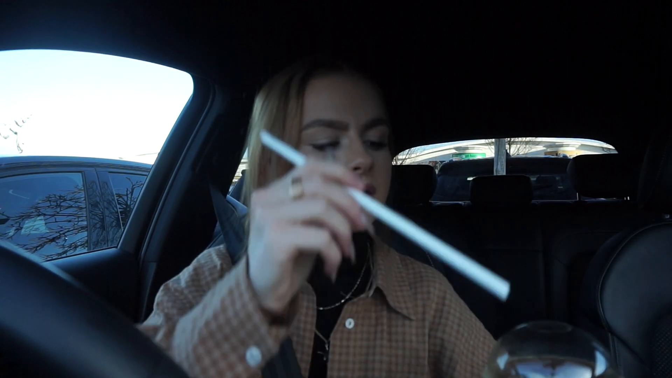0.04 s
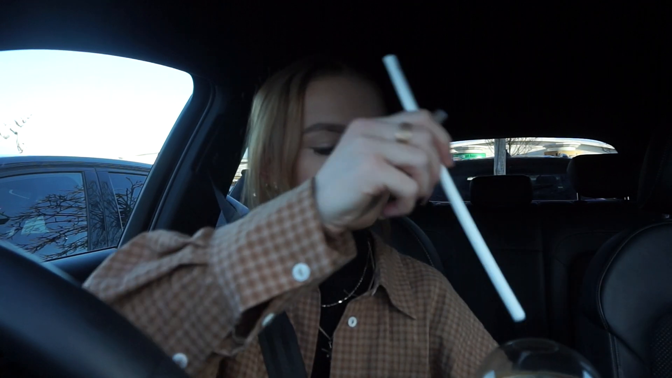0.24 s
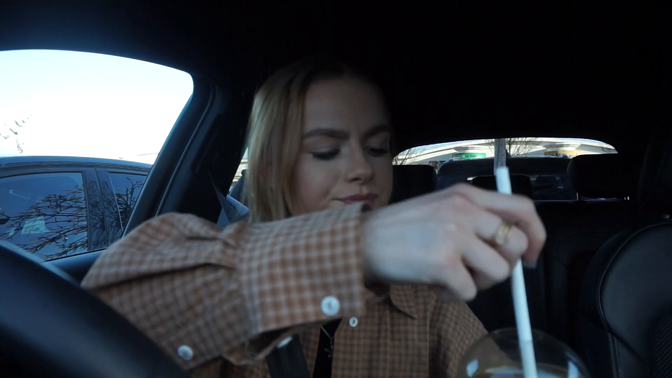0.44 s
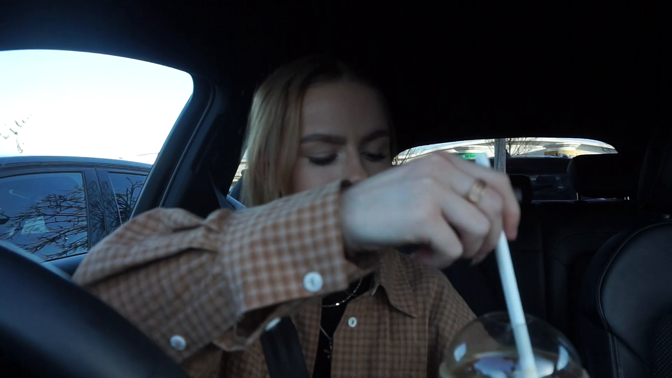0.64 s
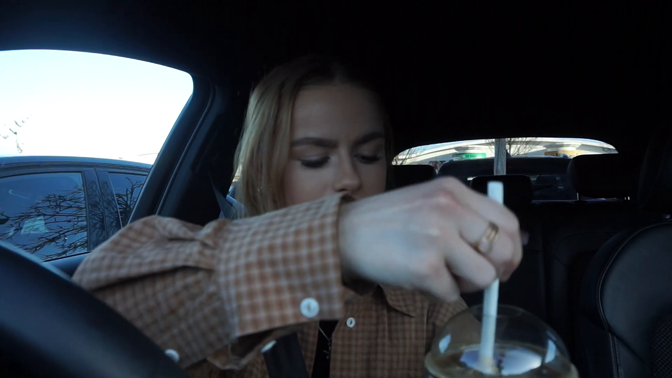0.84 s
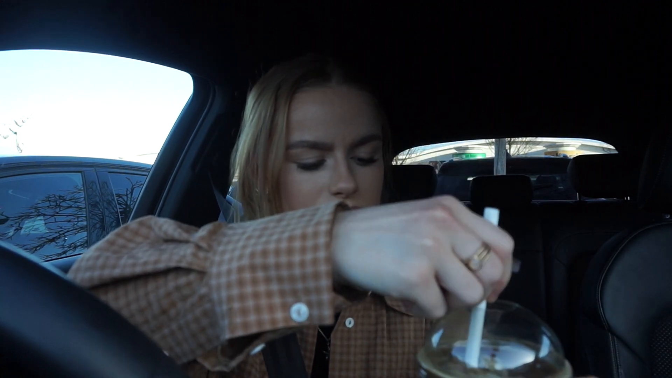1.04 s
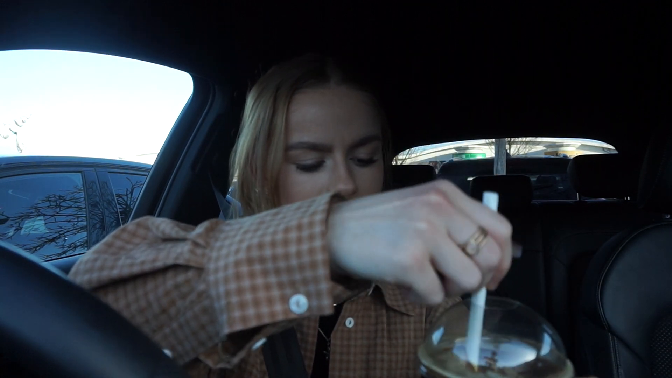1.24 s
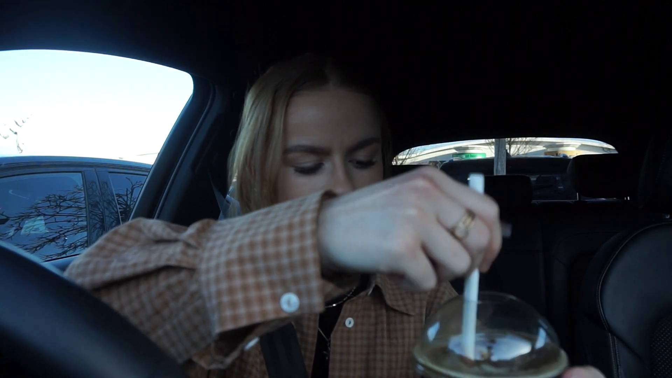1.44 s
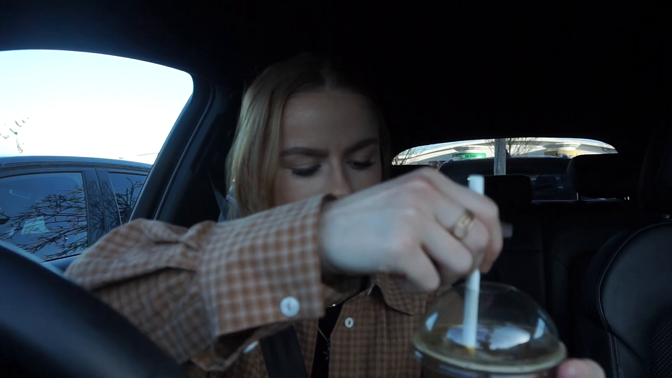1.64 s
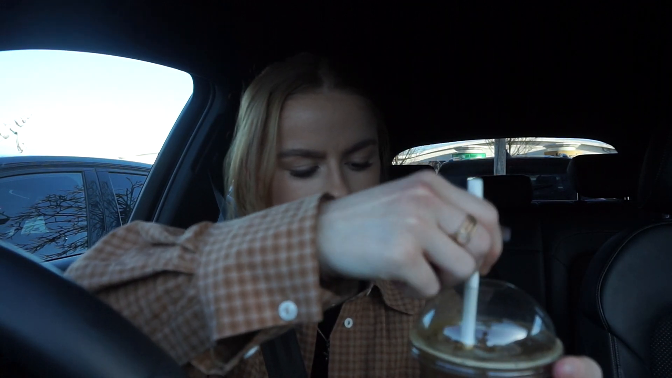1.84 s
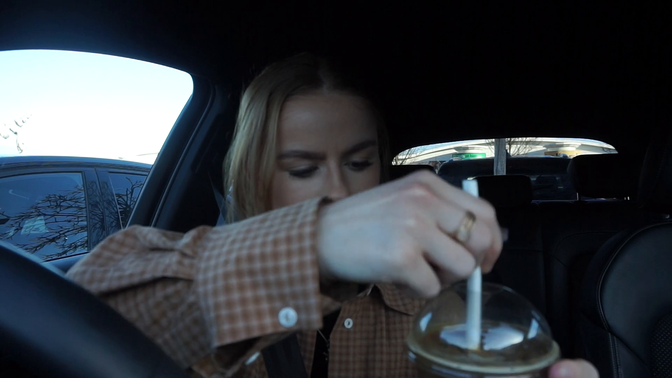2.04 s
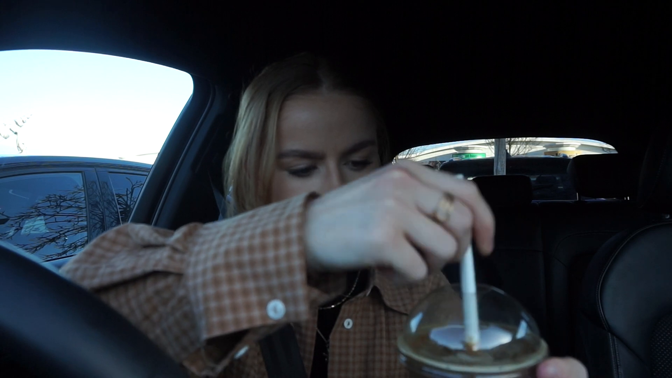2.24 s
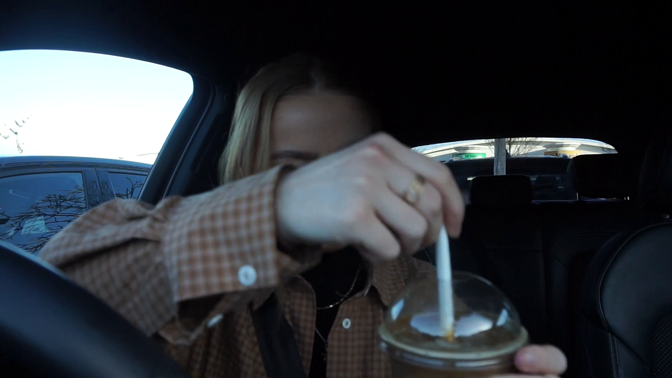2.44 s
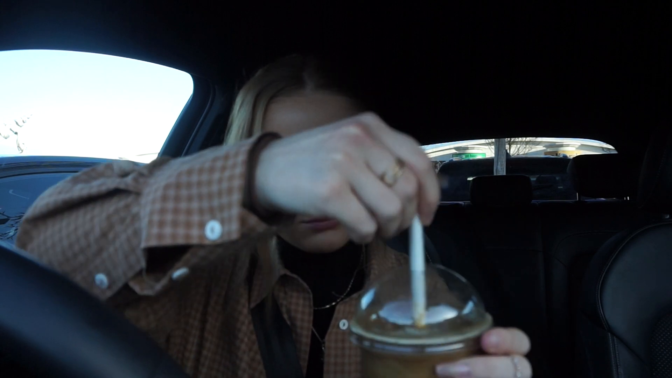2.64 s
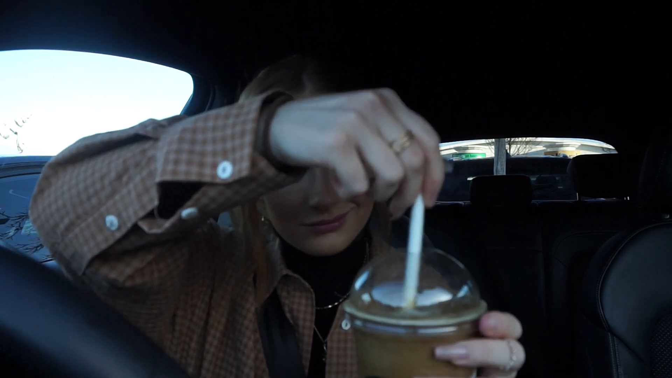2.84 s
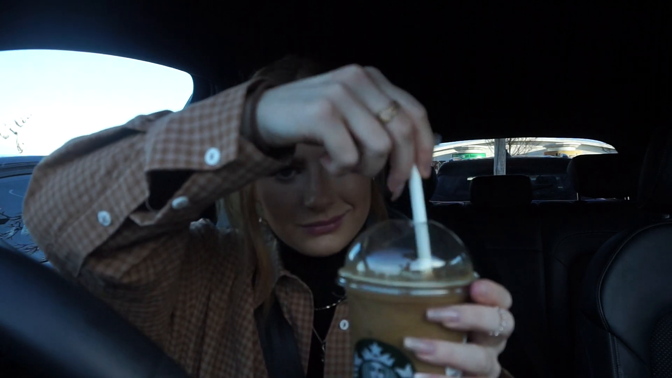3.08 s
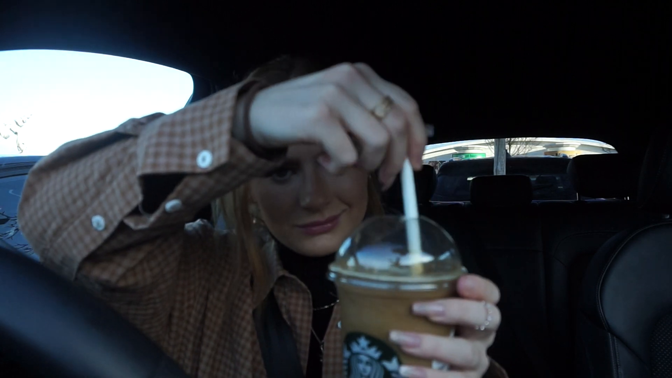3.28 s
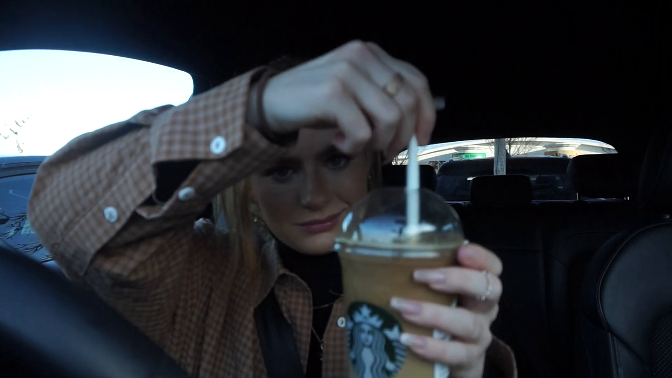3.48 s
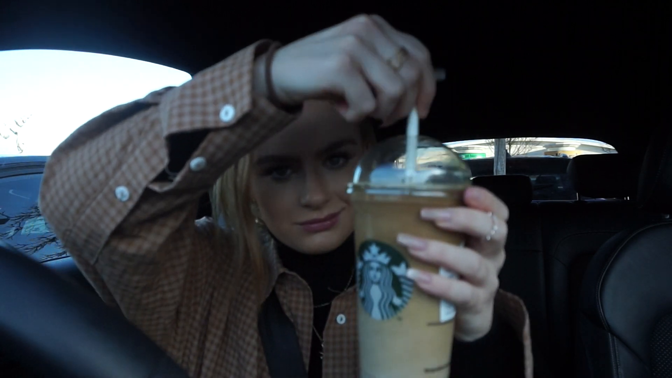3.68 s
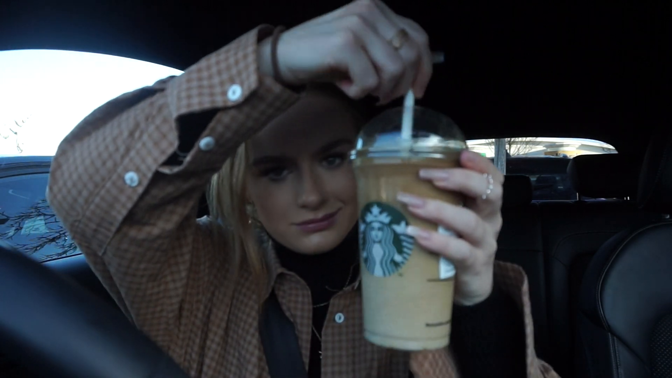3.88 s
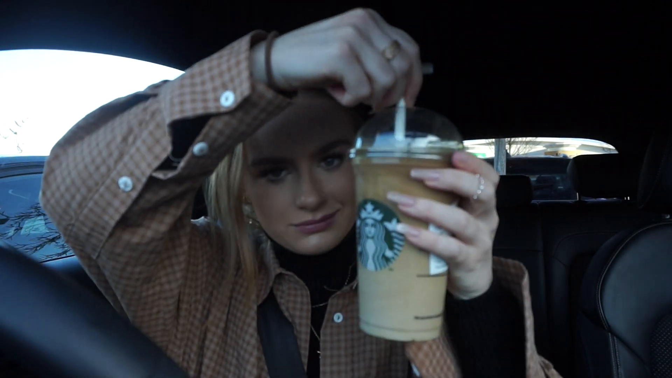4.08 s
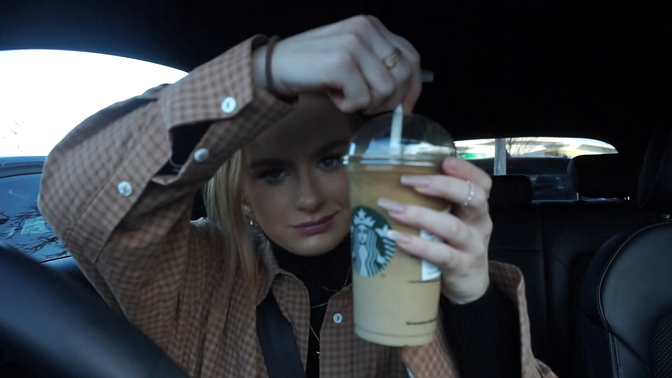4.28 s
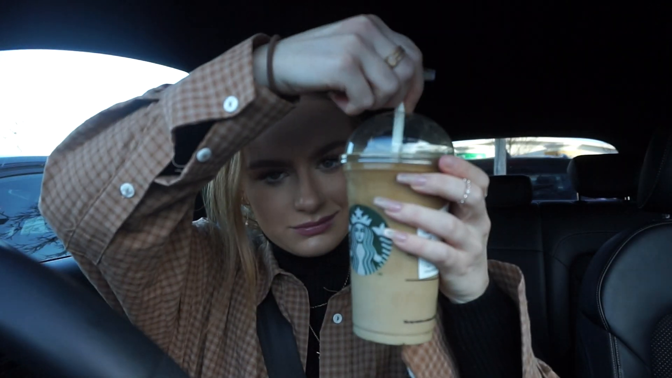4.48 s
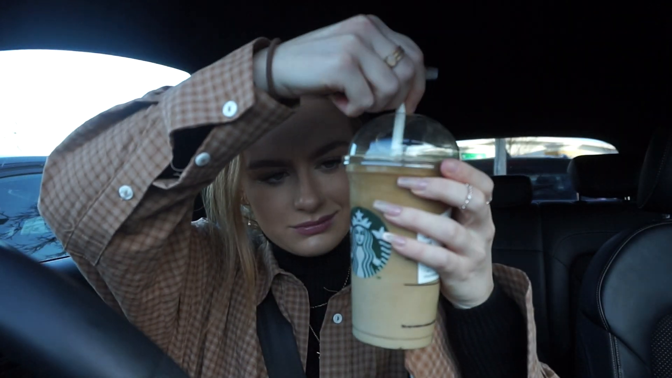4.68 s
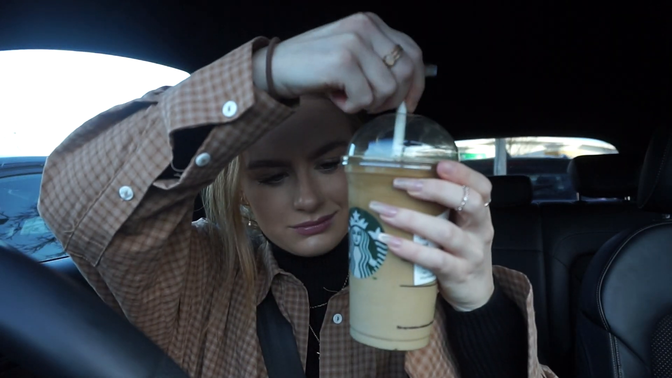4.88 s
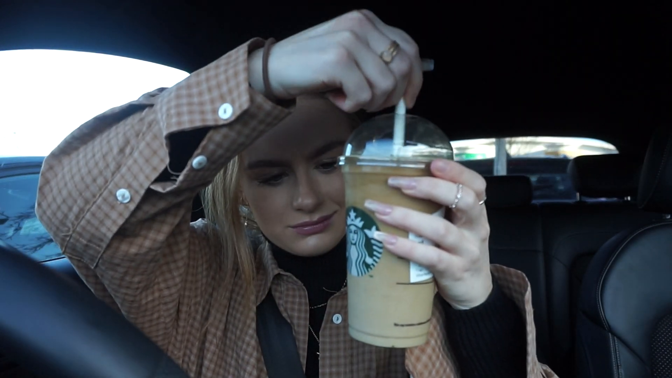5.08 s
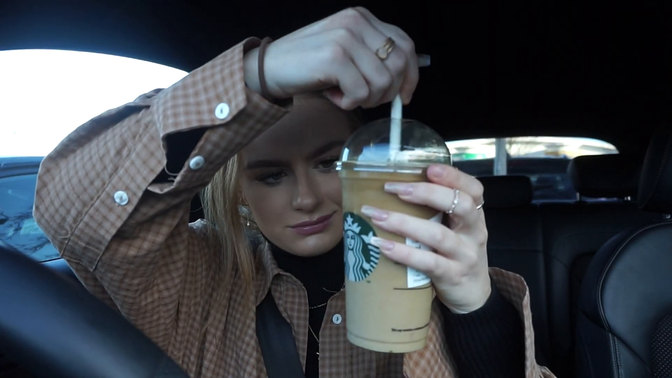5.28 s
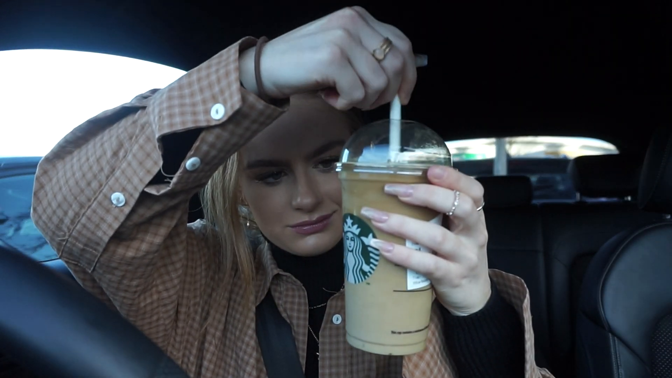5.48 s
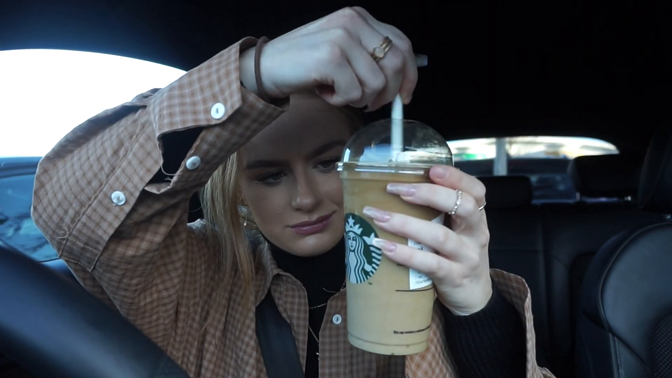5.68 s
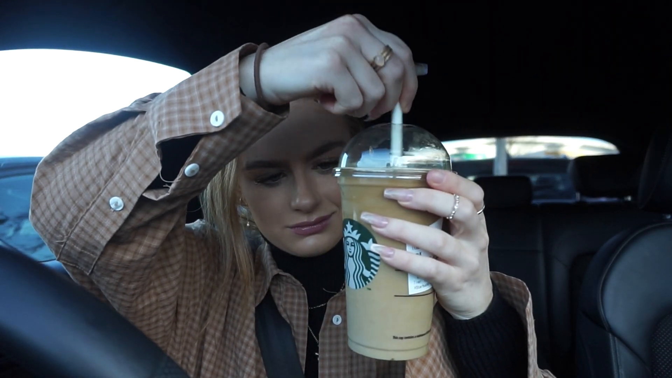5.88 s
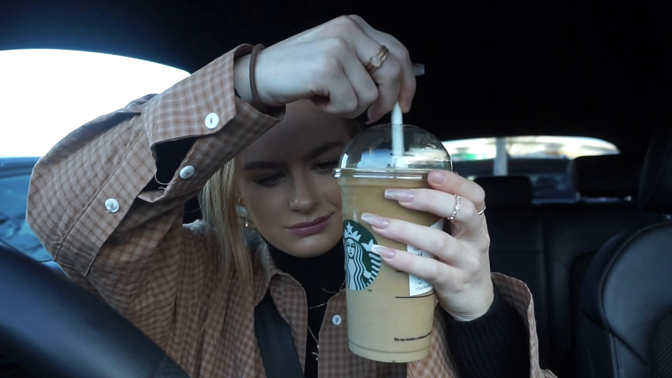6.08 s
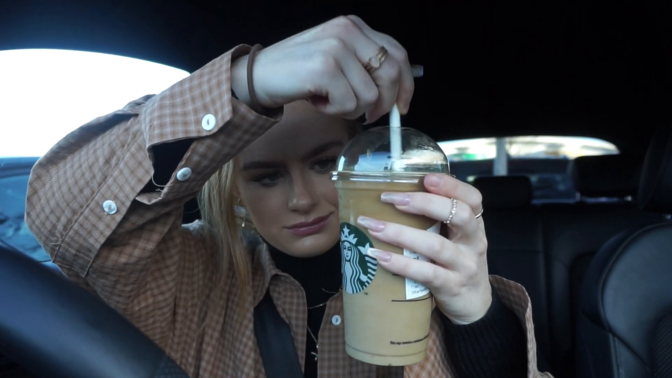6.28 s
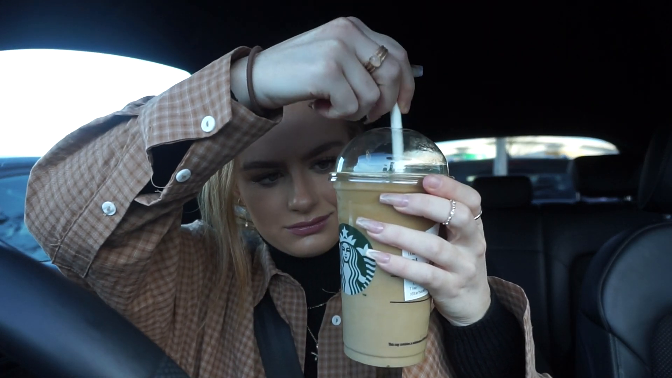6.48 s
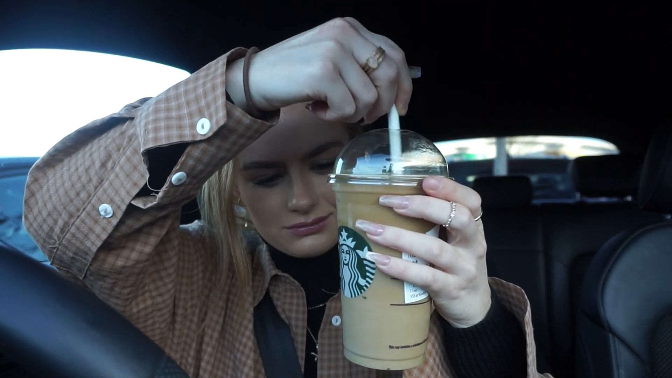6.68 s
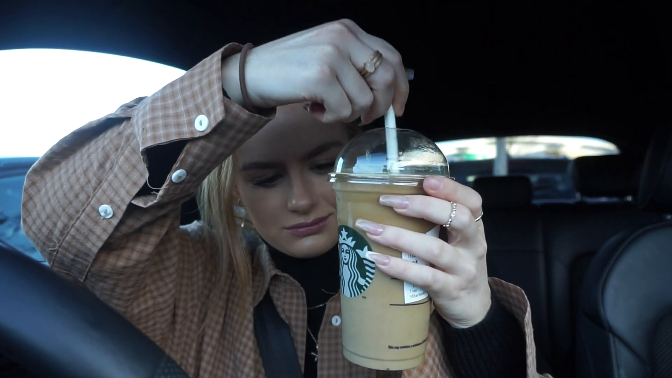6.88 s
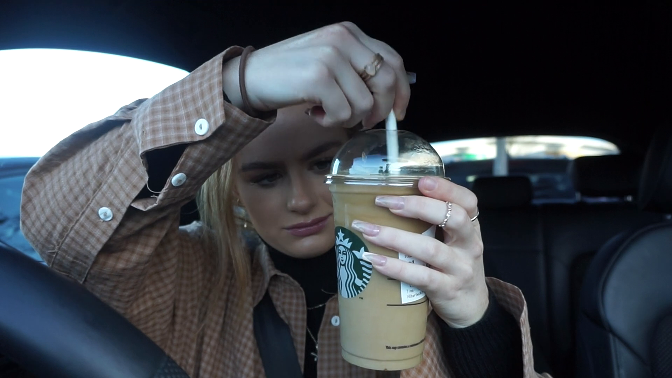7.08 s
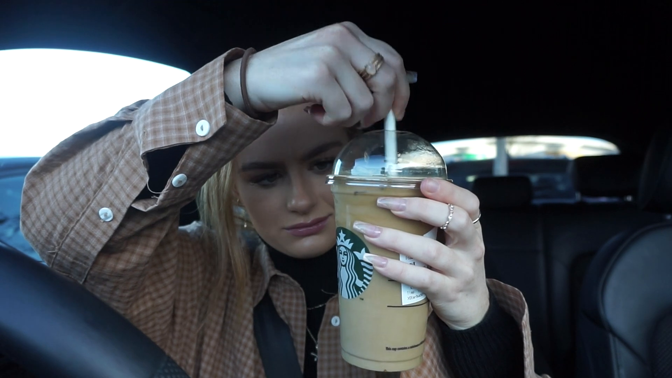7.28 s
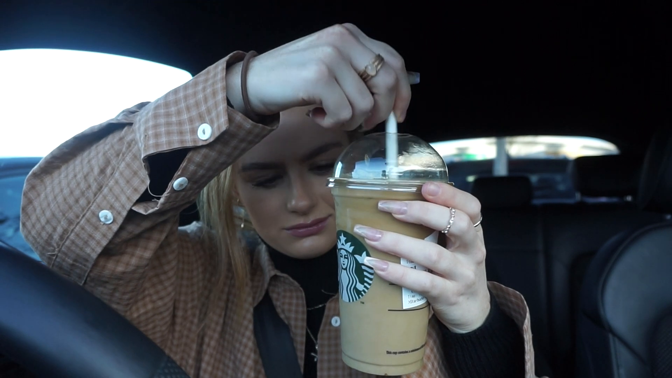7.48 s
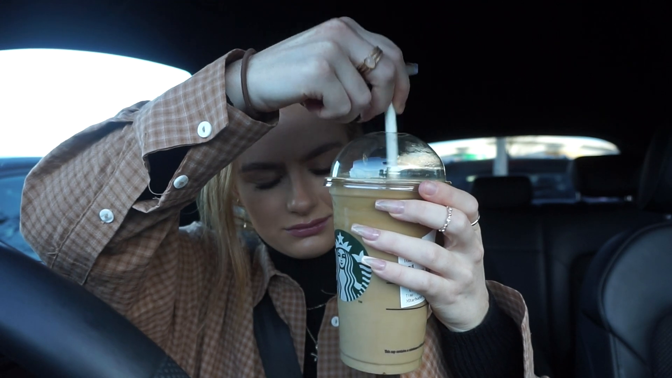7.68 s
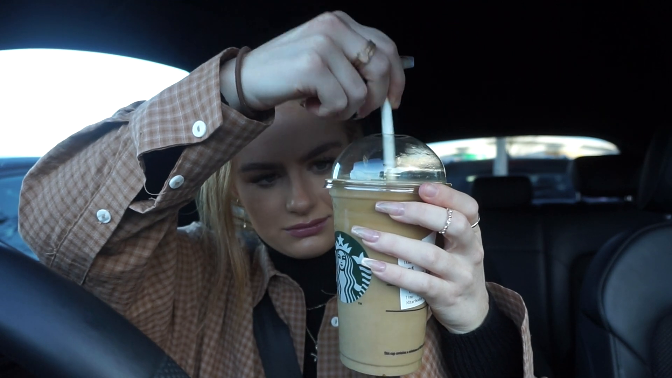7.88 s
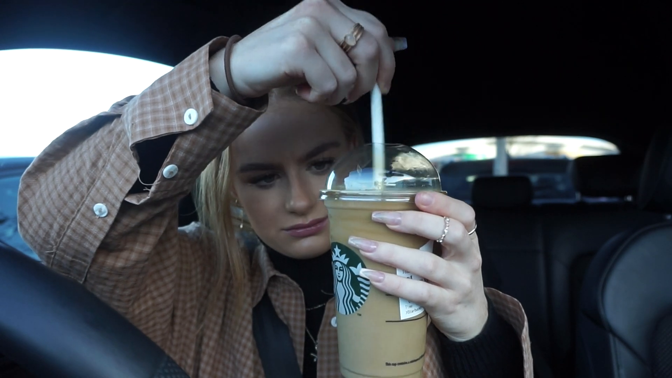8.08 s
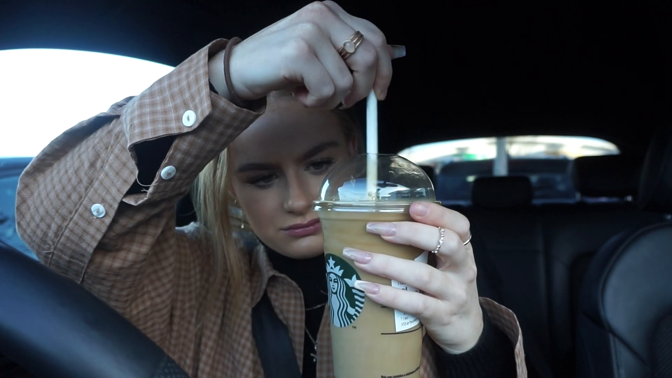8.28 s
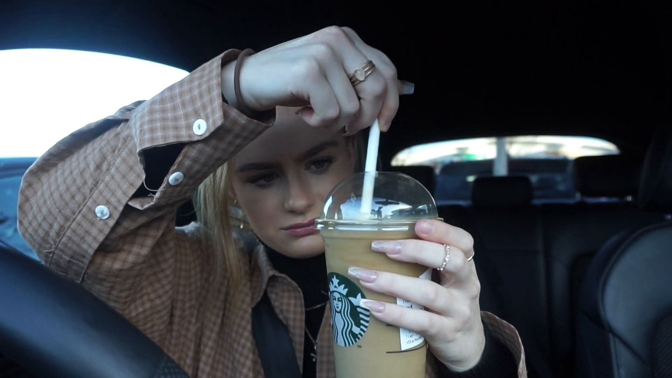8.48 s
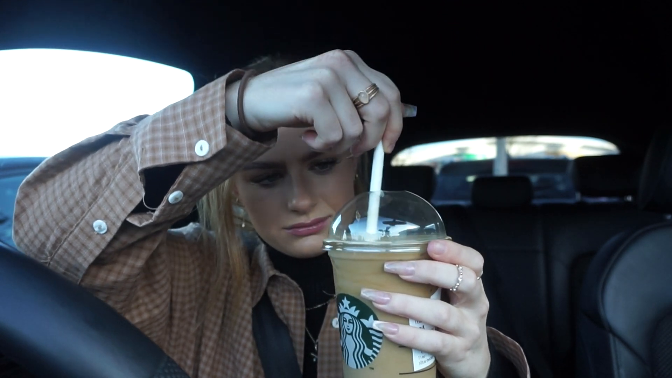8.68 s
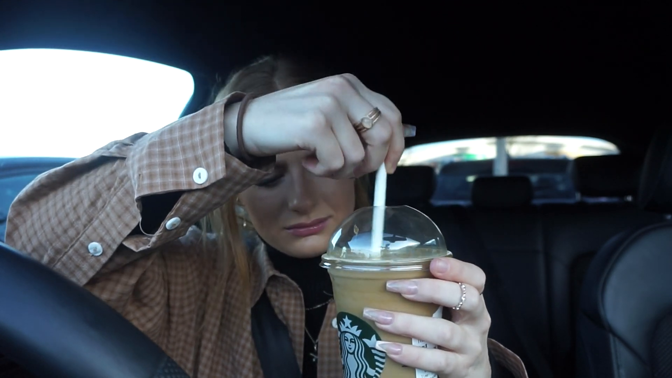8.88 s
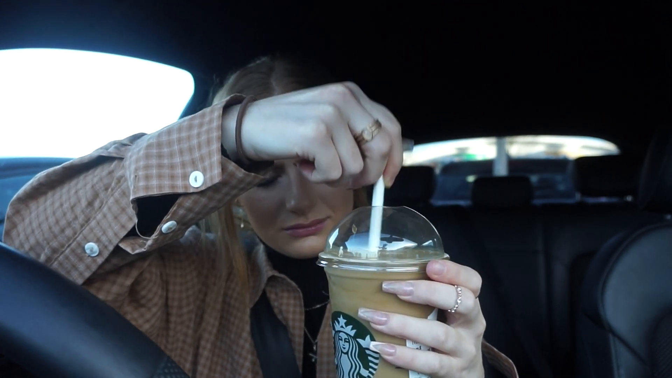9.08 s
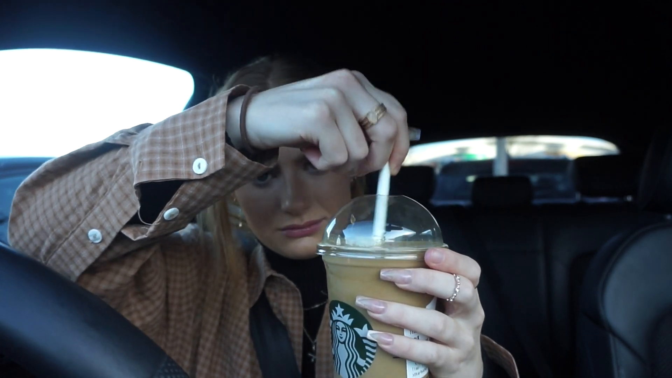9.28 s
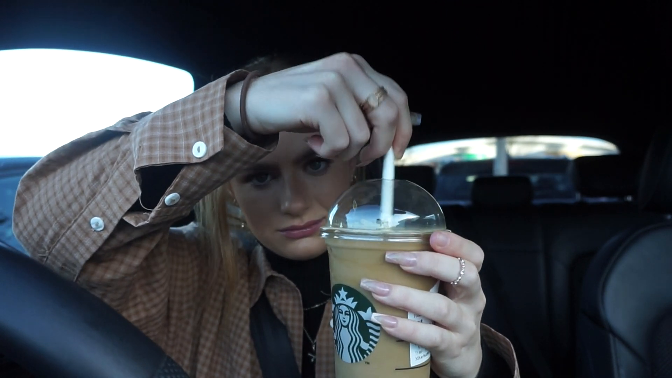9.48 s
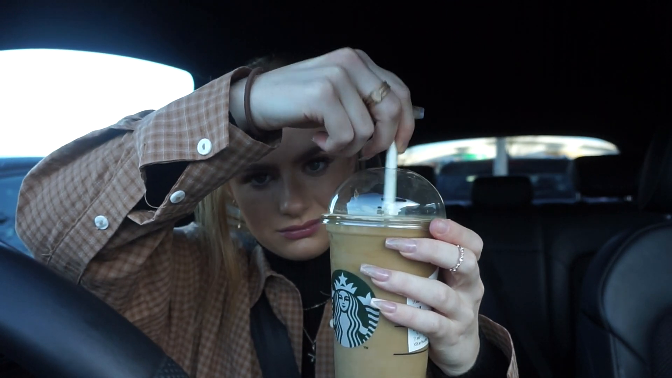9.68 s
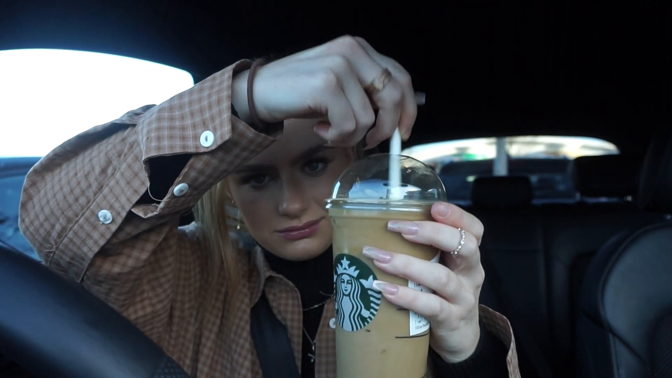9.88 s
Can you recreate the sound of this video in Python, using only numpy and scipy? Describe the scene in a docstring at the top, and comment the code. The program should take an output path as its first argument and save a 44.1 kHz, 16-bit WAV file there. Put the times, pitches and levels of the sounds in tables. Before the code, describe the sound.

Ice cubes clink, scrape and knock as a straw turns through them several times a second in a plastic cup. The first half second is sparse, then the stirring is strong and bright; as the cup is raised it becomes steadier, lighter and less nasal, with small pauses and renewed shoves until the end. Short hollow clunks rise slightly in pitch. Heard very close in a small padded car cabin with a faint rumble.

```python
"""Ice stirred by a straw in a lidded plastic cup, inside a parked car; the cup is lifted gradually from its holder.
Turns of the straw drag cubes past each other as chains of short, pitched contacts over grit; shoves are listed singly.
Knocks ring at a cube's pitch, jostling is light pitched taps, and clunks are damped rising tones.
Cracks are bright noise bursts with a high ring; crackle is fine ticks.
Close reflections are decaying stereo noise; soft sleeve bumps and a faint rumble of coloured noise lie beneath."""
import sys
import numpy as np
from scipy import signal
from scipy.fft import rfft, irfft, next_fast_len
from scipy.io import wavfile
from scipy.ndimage import uniform_filter1d

SR = 44100
rng = np.random.default_rng(int(sys.argv[2]) if len(sys.argv) > 2 else 0)


def file_out(sig):
    """Save sig as 16-bit WAV at sys.argv[1]."""
    # one column per channel
    cols = np.atleast_2d(sig).T
    # limit, then scale
    lim = np.clip(cols, -1, 1)
    pcm = np.round(lim * 32767).astype(np.int16)
    wavfile.write(sys.argv[1], SR, pcm)


N = 437913

# cabin rumble, spectral shape: (frequency [Hz], relative density [dB per Hz])
RUMBLE_SPECTRUM = [(30, -13), (45, -0.5), (65, -10), (130, -9.5), (200, -12), (300, -16), (600, -20.5),
                   (2000, -20), (6000, -33.5), (16000, -38.5)]
# a sleeve bumps something soft: (time [s], pitch [Hz], level [dB])
SLEEVE_BUMPS = [(6.917, 190, -41), (6.98, 137, -44), (6.958, 70, -41)]
# diffuse cabin sound, side against mid: (frequency [Hz], level [dB])
SIDE_COLOUR = [(200, -2), (500, -20), (900, -1), (2400, -6), (4400, 2), (15000, -10.5)]
# left against right: (frequency [Hz], level difference [dB])
LEFT_RIGHT_BALANCE = [(300, 1.5), (700, -1.5), (1300, 2.5), (2400, 1.5), (4400, 1), (15000, 4)]
# resonances of the cup in the cabin, and dips between them: (frequency [Hz], width [Hz], level [dB])
CABIN_RESONANCES = [(458.7, 20, 10), (529.5, 16, -12.5), (716.5, 120, 3), (744, 37, -12.5), (935, 20, -1),
                    (1156, 20, 4.5), (3370, 97, 2)]
# colour of the cup in its holder: (frequency [Hz], level [dB])
HOLDER_COLOUR = [(200, -34), (410, -5.5), (650, 6.5), (870, 16), (1120, 8), (1400, 0), (1750, 1.5),
                 (2100, -3.5), (2580, 11), (3100, -3), (3500, 3.5), (3850, -2.5), (4350, 3), (5100, -9),
                 (5650, -2), (6500, -13), (12000, -14.5), (16000, -24)]
# colour of the cup in the hand: (frequency [Hz], level [dB])
HAND_COLOUR = [(200, -29.5), (340, -22.5), (440, -2), (700, 6.5), (1180, 0.5), (1400, -8.5), (2200, -0.5),
               (2700, -0.5), (3100, -6), (4350, -3.5), (5200, -13.5), (12000, -23.5), (16000, -31)]
# the lift: (start [s], end [s])
LIFT_SPAN_S = (1.6, 4.4)
# range of randomly drawn cube pitches: (lowest [Hz], highest [Hz])
CUBE_RANGE_HZ = (1520, 4560)
# colour of the fine crackle: (frequency [Hz], level [dB])
CRACKLE_COLOUR = [(1200, -30), (4000, -7), (9000, 7), (16000, 4)]
# a cube cracks or chips: (time [s], relative level [dB])
ICE_CRACKS = [(0.4173, -24), (1.8294, -25), (1.9659, -22), (2.1917, -19.5), (2.8225, -20), (3.533, -17.5),
              (3.7406, -20), (4.788, -20), (5.4623, -20.5), (7.01, -30), (7.152, -27), (7.1767, -23.5),
              (7.8224, -22.5), (8.2729, -22), (8.4401, -36), (8.5932, -21.5), (8.8397, -19.5),
              (9.0155, -20), (9.0381, -24), (9.0634, -20), (9.2462, -22), (9.871, -24.5)]
# colour of a crack: (frequency [Hz], level [dB])
CRACK_COLOUR = [(2500, -4), (6000, -4.5), (16000, -2.5)]
# loose ice jostling between the strokes: (time [s], relative level [dB])
JOSTLE_LEVEL = [(0, -83), (.7, -54), (.8, -38), (6.5, -42.5), (9.93, -40.5)]
# a shoved cube makes the drink and the air above it clunk: (time [s], relative level [dB], starting pitch [Hz])
WALL_CLUNKS = [(0.487, -18, 840), (0.627, -29, 1100), (0.827, -22.5, 1050), (0.901, -40, 1050),
               (1.181, -18.5, 790), (1.298, -21.5, 780), (1.384, -21.5, 1070), (1.627, -26, 1120),
               (1.767, -23.5, 1030), (1.836, -15, 996), (2.053, -27, 670), (2.133, -21, 660),
               (2.213, -20, 871), (2.393, -26.5, 630), (2.59, -14.5, 880), (2.717, -21.5, 1180),
               (2.823, -17, 1120), (3.008, -14, 1070), (3.23, -22, 1110), (3.34, -24, 460),
               (3.466, -27, 1160), (3.786, -21, 1120), (3.875, -25, 700), (4.001, -23.5, 1160),
               (4.094, -23, 674), (4.397, -17, 600), (4.47, -26, 664), (4.575, -28, 630), (4.74, -20, 620),
               (4.901, -25.5, 680), (5.005, -27.5, 1150), (5.104, -22.5, 704), (5.183, -25.5, 1157),
               (5.393, -27, 610), (5.494, -27, 719), (5.592, -25, 1090), (5.79, -22, 747),
               (5.892, -20.5, 695), (5.983, -24.5, 590), (6.089, -22.5, 715), (6.176, -20.5, 970),
               (6.283, -22.5, 720), (6.375, -23, 704), (6.474, -28, 640), (6.564, -24, 637),
               (6.678, -22, 674), (6.878, -19.5, 705), (7.083, -21, 681), (7.157, -20.5, 1152),
               (7.285, -16.5, 701), (7.392, -23.5, 841.4), (7.481, -17.5, 684), (7.672, -20.5, 634),
               (7.901, -25.5, 716), (8.071, -16, 940), (8.162, -23.5, 1060), (8.39, -26.5, 665.3),
               (8.521, -28, 1060), (8.606, -24.5, 1170), (8.926, -28, 650), (9.04, -20.5, 1110),
               (9.111, -26.5, 1160), (9.203, -24, 1170), (9.38, -22.5, 1172), (9.451, -26, 1090),
               (9.537, -21, 1126), (9.668, -23, 594), (9.875, -30, 716)]
# the firmest knocks of the cubes: (time [s], relative level [dB], pitch [Hz])
CUBE_KNOCKS = [(0.3775, -24, 3400), (0.417, -15, 3870.0), (0.6375, -25, 2580), (0.713, -10, 4450),
               (0.7505, -16, 2570), (0.8927, -14, 2980), (0.9115, -13.5, 3430), (0.9553, -15.0, 3900.0),
               (1.0121, -13.5, 4350.0), (1.1679, -19, 1820), (1.1799, -12, 1780), (1.3515, -21, 4690.0),
               (1.3759, -14.5, 2450), (1.4159, -16.5, 3850), (1.4373, -8, 4200.0), (1.5466, -20, 2310),
               (1.5555, -16.5, 2670), (1.6258, -17.5, 1500), (1.6497, -21.5, 4800), (1.8297, -18.5, 1480),
               (1.9307, -18.5, 3940), (1.9671, -15.5, 2900), (2.0514, -15.5, 4700), (2.1905, -13.5, 2410.0),
               (2.2911, -16, 1730), (2.3215, -26.5, 2360), (2.3635, -19.5, 1770), (2.3866, -9.5, 4250),
               (2.587, -9.5, 2430), (2.717, -12.5, 1410), (2.7271, -11, 1450), (2.7857, -13, 2360),
               (2.8154, -9, 2690), (2.9702, -22.5, 3540), (3.008, -9.5, 1530), (3.0384, -14, 4800),
               (3.0505, -10.5, 4690.0), (3.2293, -22.5, 2610.0), (3.3405, -19, 2480), (3.4503, -17.5, 1600),
               (3.5201, -18, 2120), (3.8397, -19, 3250), (3.8749, -17, 3620.0), (3.9995, -19.5, 1410),
               (4.0432, -15, 3730), (4.2209, -24, 3400), (4.254, -13.5, 4400), (4.4601, -19.5, 2700.0),
               (4.6566, -23.5, 2621), (4.7385, -23.5, 4630.0), (4.7784, -21, 2190.0), (4.8344, -17, 2480),
               (4.8604, -21.5, 4800), (5.0025, -19, 2072), (5.0115, -25, 2120), (5.0407, -15, 1910.0),
               (5.1816, -23, 3700), (5.2232, -20.5, 1780), (5.2379, -21.5, 4400), (5.2621, -15.5, 2460),
               (5.2936, -16.5, 4170), (5.4399, -15.5, 4660), (5.6698, -21.5, 2710.0), (6.0347, -15, 2200),
               (6.1739, -22.5, 3650.0), (6.5725, -20, 3420), (6.7732, -18, 4000), (6.8162, -16, 1597),
               (6.8522, -20.5, 1500.0), (7.0095, -11.5, 2390), (7.1525, -13.5, 2320), (7.2133, -18.5, 1670),
               (7.2829, -31, 3160), (7.4147, -23, 1600), (7.5314, -21.5, 4050), (7.6206, -23, 2850),
               (7.8222, -16.5, 2173), (7.8365, -23.5, 2430), (8.0436, -19, 2730), (8.0746, -15, 4270),
               (8.16, -14.5, 2600), (8.174, -17.5, 1430), (8.2421, -25, 3940), (8.44, -14.5, 3780),
               (8.5941, -24, 1470), (8.6593, -20.5, 2580.0), (8.7548, -19, 2800), (8.7885, -16.5, 1920),
               (8.844, -14, 1615), (9.0382, -15, 1565), (9.0787, -15, 4130), (9.1078, -22.5, 2660),
               (9.202, -23, 2500), (9.2461, -17, 2650), (9.3158, -17.5, 3720), (9.449, -19, 2544),
               (9.4715, -20, 1680.0), (9.5651, -19.5, 4663), (9.74, -18, 1720), (9.8327, -17.5, 1600)]
# moments when the straw falters and the ice settles: (time [s])
STRAW_PAUSES = [1.109, 1.701, 2.468, 2.54, 3.4, 4.71, 5.724, 6.319, 6.498, 6.53, 6.71, 6.96, 7.32, 7.958,
                8.22, 9.628]
# hard shoves through packed ice:
# (time [s], relative level [dB], length [s], swell [s], relative treble [dB])
STRAW_SHOVES = [(0.005, -28.5, 0.042, 0.01, -28), (0.143, -32.5, 0.063, 0.0065, -28),
                (0.377, -18, 0.062, 0.0018, -24), (0.706, -14, 0.085, 0.013, -14),
                (0.952, -19, 0.094, 0.066, -11.5), (1.148, -19, 0.086, 0.0082, -17),
                (1.2543, -18, 0.047, 0.0059, -19.5), (1.917, -19.5, 0.1, 0.0067, -24),
                (2.8833, -18.5, 0.096, 0.0073, -15.5), (3.245, -21, 0.095, 0.005, -14.5),
                (3.834, -23.5, 0.089, 0.013, -25), (4.774, -26.5, 0.085, 0.01, -17),
                (5.212, -28, 0.1, 0.025, -7), (7.992, -27.5, 0.076, .03, -26),
                (8.043, -12.5, 0.069, 0.039, -20), (8.246, -25.5, 0.066, 0.003, -15),
                (8.788, -28.5, 0.13, 0.0041, -9), (9.006, -27.5, 0.094, 0.015, -18)]
# spells of even stirring: (start [s], end [s], time for one turn [s], relative level [dB])
STIRRING_SPELLS = [(0.712, 1.48, 0.23, -19.5), (1.549, 3.1, 0.22, -35.5), (3.25, 3.55, 0.27, -25),
                   (3.606, 5.68, 0.19, -27.5), (5.785, 6.25, 0.17, -26.5), (6.369, 6.9, 0.18, -32),
                   (7.169, 7.7, 0.21, -22.5), (8.383, 9.33, 0.21, -25.5), (9.447, 9.88, 0.29, -28)]

TAPS = 2048
GRID_HZ = np.maximum(np.fft.rfftfreq(TAPS, 1 / SR), 1)
SIDES = np.array([[1], [-1]])   # left, right
RUMBLE_DB, CUTOFF_HZ = -54.5, 16000
HOLDER_LEAN_DB = 1.1   # left up, right down by this much
CLUNK_RISE_PER_S = 0.86   # share of the starting pitch per second
CLUNK_CLICK_DB = -6.5   # added to the clunk's table level
SAME_PUSH_S, SAME_KNOCK_S = 0.035, 0.008   # a listed event replaces a regular one this close
DRAG_S, DRAG_SWELL_S, DRAG_RELATIVE_TREBLE_DB = 0.11, 0.011, -14
RELEASE_S = 0.017
REST_LEAD_S = 0.023   # ice jams this long before it breaks loose


def from_db(db):
    """Decibels to gain."""
    return 10 ** (np.asarray(db) / 20)


def unit(x):
    """Scale to an energy of one."""
    return x / np.sqrt(np.sum(x ** 2) + 1e-20)


def at_hz(points, hz):
    """Read a spectrum in dB along a log-frequency axis."""
    f, db = np.transpose(points)
    return np.interp(np.log(np.maximum(hz, 1)), np.log(f), db)


def tint(x, points):
    """Colour a noise with a spectrum."""
    size = x.shape[-1]
    gain = from_db(at_hz(points, np.fft.rfftfreq(size, 1 / SR)))
    return irfft(rfft(x) * gain, size)


def peak(hz, width_hz):
    """Bell shape of one resonance, height one."""
    return 1 / (1 + (2 * (GRID_HZ - hz) / width_hz) ** 2)


def ringing(db):
    """Minimum-phase impulse response with the given levels on GRID_HZ: nothing sounds before the blow."""
    cepstrum = irfft(np.log(from_db(db)))
    cepstrum[1:TAPS // 2] *= 2
    cepstrum[TAPS // 2 + 1:] = 0
    return irfft(np.exp(rfft(cepstrum)))


def clink_gain(x):
    """Rms spectral magnitude of a short sound between 1.4 and 5 kHz."""
    size = max(len(x), TAPS)
    hz = np.fft.rfftfreq(size, 1 / SR)
    band = (hz > 1400) & (hz < 5000)
    return np.sqrt(np.mean(abs(rfft(x, size)[band]) ** 2) + 1e-20)


def add(track, s, sound):
    """Mix a sound in at a time in seconds."""
    start = max(round(s * SR), 0)
    part = sound[..., :max(N - start, 0)]
    track[..., start:start + part.shape[-1]] += part


def clear_of(strong, regular, apart_s):
    """The regular events that do not coincide with a strong one."""
    return [row for row in regular if min(abs(row[0] - other[0]) for other in strong) > apart_s]


def rumble():
    """Outside noise seeps through the closed body, nearly alike on both sides in the bass."""
    mid, side = tint(rng.standard_normal((2, next_fast_len(N))), RUMBLE_SPECTRUM)[:, :N]
    side = signal.lfilter(*signal.butter(1, 1300, "high", fs=SR), side)
    return from_db(RUMBLE_DB) * (mid + side * SIDES) / np.std(mid)


def bumps(swell_s):
    """A soft blow is a low sine that swells and dies."""
    out, t = np.zeros(N), np.arange(4 * TAPS) / SR
    envelope = t / swell_s * np.exp(1 - t / swell_s)
    for s, hz, db in SLEEVE_BUMPS:
        add(out, s, from_db(db) * envelope * np.sin(2 * np.pi * hz * t))
    return out


def cabin_tail(t60_s, treble_t60_s):
    """Stock of diffuse stereo noise in two bands split at 5 kHz, with the decay of each."""
    mid, side = rng.standard_normal((2, 32 * TAPS))
    diffuse = mid + tint(side, SIDE_COLOUR) * SIDES
    low = signal.sosfiltfilt(signal.butter(2, 5000, fs=SR, output="sos"), diffuse)
    t = np.arange(2 * TAPS) / SR
    bands = ((low, t60_s), (diffuse - low, treble_t60_s))
    return [(band, from_db(-60 * t / decay_s) * (t > .0005)) for band, decay_s in bands]


def placed(sound, cabin, wet_db, echo_db=-9.5, spread_db=1.5):
    """A contact's place in the cup sets its reflections: the windscreen's, and a short diffuse tail."""
    start = rng.integers(30 * TAPS)
    tail = sum(band[:, start:start + len(decay)] * decay for band, decay in cabin)
    response = from_db(wet_db) * np.sqrt(2) * unit(tail)
    response[[0, 1], rng.integers(2, size=2)] += 1   # direct sound, up to one sample apart
    response[:, round(rng.uniform(.004, .009) * SR)] += from_db(echo_db)
    response *= from_db(rng.normal(0, spread_db) * SIDES)
    return signal.fftconvolve(sound[None], np.sqrt(2) * unit(response), axes=1)


def resonate(x):
    """Standing resonances ring on after each contact; the left-right balance varies with frequency."""
    modes = sum(db * peak(hz, width_hz) for hz, width_hz, db in CABIN_RESONANCES)
    lean = at_hz(LEFT_RIGHT_BALANCE, GRID_HZ) / 2
    responses = np.array([ringing(modes + lean), ringing(modes - lean)])
    return signal.oaconvolve(x, responses, axes=1)[:, :N]


def cup(contacts):
    """Plastic wall and air under the lid colour the contacts; the colour crossfades as the cup is lifted."""
    lifted = np.interp(np.arange(N) / SR, LIFT_SPAN_S, [0, 1])
    held = (1 - lifted) * from_db(HOLDER_LEAN_DB * SIDES)
    out = np.zeros((2, N))
    for colour, share in ((HOLDER_COLOUR, held), (HAND_COLOUR, lifted)):
        body = ringing(at_hz(colour, GRID_HZ))
        out += signal.oaconvolve(contacts * share, body[None] / clink_gain(body), axes=1)[:, :N]
    return out


def slips(size, per_s, spread_db):
    """Random tiny contacts of uneven strength and either sign."""
    strength = from_db(spread_db * np.minimum(rng.exponential(1, size), 3.5))
    return (rng.random(size) < per_s / SR) * strength * rng.choice([-1, 1], size)


def chatter(decay_s, rise_s, snap=0.29):
    """Force of one contact: a sharp touch amid micro-impacts that swell and die within milliseconds."""
    t = np.arange(TAPS // 2) / SR
    envelope = (1 - np.exp(-t / rise_s)) ** 2.2 * np.exp(-t / decay_s)
    force = unit(slips(len(t), 6000, 0.97) * envelope)
    force[round(.001 * SR)] += snap
    return unit(force)


def any_pitch():
    """Pitch in Hz of a cube picked at random."""
    return np.exp(rng.uniform(*np.log(CUBE_RANGE_HZ)))


def cube(force, hz, treble_db, ring_db, width_hz, partner=0.71):
    """A cube rings at its pitch and overtone, the one it touches more weakly; treble_db shapes the top."""
    # touching cubes are of similar size: pitches lie within about half an octave
    partner_hz = np.clip(hz * 2 ** rng.uniform(-0.5775, 0.55), *CUBE_RANGE_HZ)
    pitches = np.array([hz, partner_hz])
    overtones = pitches * rng.uniform(2.51, 3.26, 2)
    bells = [share * peak(f, width_hz) for f, share in zip(pitches, (1, partner))]
    bells += [0.56 * peak(f, 2 * width_hz) for f in overtones]
    treble_shelf = 1 / (1 + (5000 / GRID_HZ) ** 6)
    response = ringing(ring_db * np.max(bells, axis=0) + treble_db * treble_shelf)
    sound = signal.fftconvolve(force, response)
    return sound / clink_gain(sound)


def stillness(times, rest_s=0.016):
    """Near one where ice lies still: before knocks, clunks and shoves, and where the straw falters."""
    events = [row[0] for row in [*CUBE_KNOCKS, *WALL_CLUNKS, *STRAW_SHOVES]]
    jams = np.append(np.array(events) - REST_LEAD_S, STRAW_PAUSES)
    return np.exp(-((times[:, None] - jams) / rest_s) ** 2).max(axis=1)


def crackle(ice, cabin, level_db, per_s, spread_db, follow_s, count=14):
    """Wet ice faces tick finely at several places, scaled by the running rms of the ice sound."""
    motion = np.sqrt(abs(uniform_filter1d(np.mean(ice ** 2, axis=0), int(follow_s * SR))))
    out = np.zeros((2, N))
    for hz in np.geomspace(4000, 13000, count):
        tick = ringing(at_hz(CRACKLE_COLOUR, GRID_HZ) + 7 * peak(hz, 1800))
        ticks = slips(N, per_s / count, spread_db)
        out += signal.oaconvolve(ticks[None], placed(tick, cabin, wet_db=-3.0), axes=1)[:, :N]
    return from_db(level_db) * motion * out / np.std(out)


def jostle(cabin, level_db, treble_db, spread_db, rest_db, count=430):
    """Floating cubes keep tapping each other lightly, more softly where the ice jams."""
    out = np.zeros((2, N))
    times = (np.arange(count) + rng.random(count)) * N / SR / count
    levels = np.interp(times, *np.transpose(JOSTLE_LEVEL)) + rest_db * stillness(times)
    levels += spread_db * (rng.random(count) - .5)
    for s, db in zip(times, levels):
        force = chatter(0.0017, rise_s=0.0022)
        sound = cube(force, any_pitch(), treble_db, ring_db=13.0, width_hz=186)
        add(out, s, placed(sound, cabin, wet_db=-1.5) * from_db(db + level_db))
    return out


def cracks(cabin, level_db, chatter_s, ring_db=10):
    """Brittle ice splits in a short bright burst; the chip rings at a high pitch of its own."""
    out = np.zeros((2, N))
    for s, db in ICE_CRACKS:
        chip = peak(rng.uniform(4850, 10600), 1100)
        colour = ringing(at_hz(CRACK_COLOUR, GRID_HZ) + ring_db * chip)
        sound = unit(signal.fftconvolve(chatter(chatter_s, rise_s=chatter_s), colour))
        add(out, s, placed(sound, cabin, wet_db=-3.0) * from_db(db + level_db))
    return out


def clunks(cabin, level_db, cycles, overtone_db, lowest_hz):
    """The damped cup rings for few cycles, sliding up as the drink closes in; so small a cup radiates no bass."""
    out, t = np.zeros((2, N)), np.arange(TAPS) / SR
    for s, db, hz in WALL_CLUNKS:
        turns = hz * t * (1 + CLUNK_RISE_PER_S * t / 2)
        overtone = np.sin(2 * np.pi * turns * rng.uniform(1.4, 2.53))
        tone = np.sin(2 * np.pi * turns) + from_db(overtone_db) * overtone
        swing = (1 - np.exp(-turns / 0.34)) * np.exp(-turns / cycles) * tone
        sound = placed(unit(swing), cabin, wet_db=1.0, echo_db=-3.5)
        add(out, s - .001, sound * from_db(db + level_db))
    return signal.sosfilt(signal.butter(5, lowest_hz, "high", fs=SR, output="sos"), out)


def knocks(cabin, level_db, treble_db, chatter_s):
    """Firm contacts of a cube with its neighbour or the wall, and the contact clicks that open clunks."""
    out = np.zeros((2, N))
    clicks = [(s - .001, db + CLUNK_CLICK_DB, any_pitch()) for s, db, _ in WALL_CLUNKS]
    for s, db, hz in [*CUBE_KNOCKS, *clear_of(CUBE_KNOCKS, clicks, SAME_KNOCK_S)]:
        force = chatter(chatter_s, rise_s=0.0032, snap=0.26)
        sound = cube(force, hz, treble_db, ring_db=14.5, width_hz=610, partner=0.73)
        add(out, s, placed(sound, cabin, wet_db=-0.5) * from_db(db + level_db))
    return out


def stroke(t, length_s, swell_s):
    """Force of one push of the straw: it builds up, holds and lets go."""
    return np.clip((t + .001) / swell_s, 0, 1) * np.clip((length_s - t) / RELEASE_S, 0, 1)


def drags():
    """One drag per turn of the straw, as rows like STRAW_SHOVES, left out beside a shove."""
    rows = []
    for start_s, end_s, turn_s, db in STIRRING_SPELLS:
        for s in np.arange(start_s, end_s, turn_s):
            rows.append((s, db, DRAG_S, DRAG_SWELL_S, DRAG_RELATIVE_TREBLE_DB))
    return clear_of(STRAW_SHOVES, rows, SAME_PUSH_S)


def scrapes(rows, cabin, level_db, treble_db, uneven_db, chatter_s, grit_db, rest_db, count):
    """Stick and slip: each push is a chain of uneven contacts, cube after cube, over fine grit."""
    out = np.zeros((2, N))
    for s, db, length_s, swell_s, treble in rows:
        t = np.arange(int(np.clip(length_s * SR, 64, 4 * TAPS))) / SR
        gain = np.sqrt(len(t)) * from_db(db)
        delays = length_s * (np.arange(count) + rng.random(count)) / count
        uneven = from_db(uneven_db * rng.uniform(-1.3, 1, count))
        forces = unit(stroke(delays, length_s, swell_s) * uneven)
        forces = forces * from_db(rest_db * stillness(s + delays))
        for delay, force in zip(delays, forces):
            contact = chatter(chatter_s, rise_s=0.00054)
            sound = cube(contact, any_pitch(), treble + treble_db, ring_db=14.0, width_hz=370)
            add(out, s + delay, placed(sound, cabin, wet_db=-2.0) * force * gain * from_db(level_db))
        grit = slips(4 * TAPS, 5000, 2.0)[:len(t)] * stroke(t, length_s, swell_s)
        sound = cube(grit, any_pitch(), treble + treble_db, ring_db=10.5, width_hz=3400)
        add(out, s, placed(sound, cabin, wet_db=-3.0) * gain * from_db(grit_db))
    return out


def scene():
    """Ice through the cup, clunks, crackle and cracks, in the small cabin over bumps and rumble."""
    cabin = cabin_tail(t60_s=0.13, treble_t60_s=0.099)
    contacts = knocks(cabin, level_db=22.5, treble_db=1.0, chatter_s=0.0019)
    contacts += scrapes(STRAW_SHOVES, cabin, level_db=-9.5, treble_db=21.5, uneven_db=5.0,
                        chatter_s=0.0019, grit_db=-10.0, rest_db=0.5, count=9)
    contacts += scrapes(drags(), cabin, level_db=-5.5, treble_db=18.0, uneven_db=8.0,
                        chatter_s=0.002, grit_db=-15.5, rest_db=-6.0, count=7)
    contacts += jostle(cabin, level_db=36.5, treble_db=2.0, spread_db=13.5, rest_db=-7.0)
    ice = cup(contacts)
    drink = ice + clunks(cabin, level_db=19.0, cycles=1.98, overtone_db=-14.0, lowest_hz=356)
    drink += crackle(ice, cabin, level_db=-20.5, per_s=150, spread_db=9.0, follow_s=0.03)
    drink += cracks(cabin, level_db=13.5, chatter_s=0.0012)
    return resonate(drink) + bumps(swell_s=0.0061) + rumble()


def record(dry):
    """The top is cut steeply above CUTOFF_HZ."""
    return signal.sosfilt(signal.ellip(10, .2, 80, CUTOFF_HZ, fs=SR, output="sos"), dry)


dry = scene()
out = record(dry)
file_out(out)
```